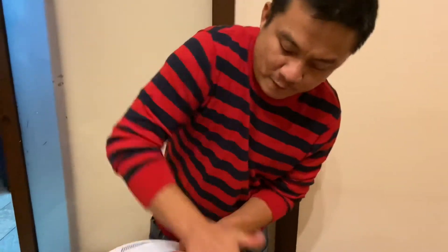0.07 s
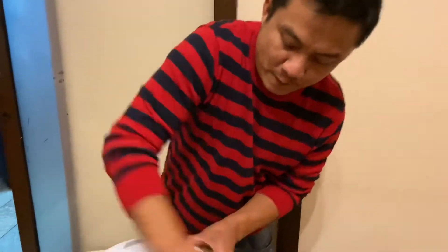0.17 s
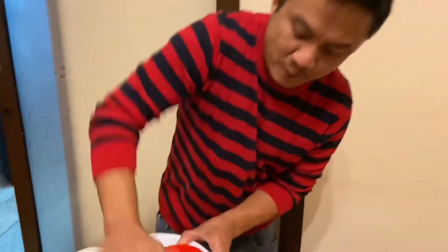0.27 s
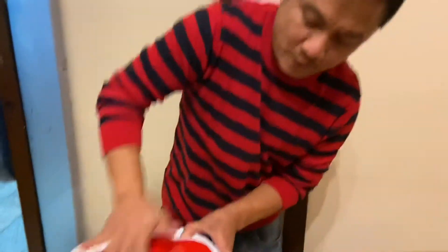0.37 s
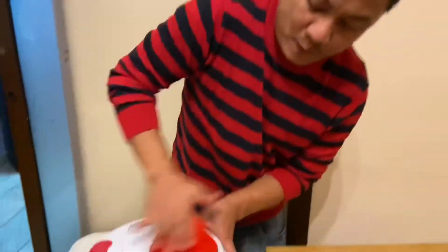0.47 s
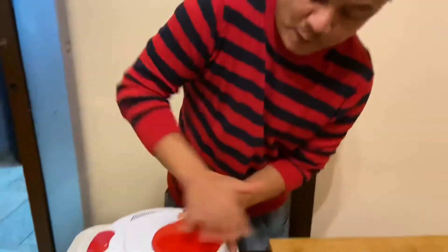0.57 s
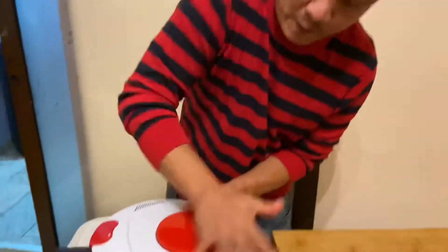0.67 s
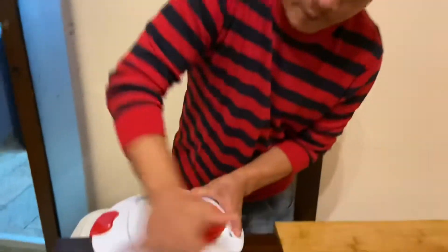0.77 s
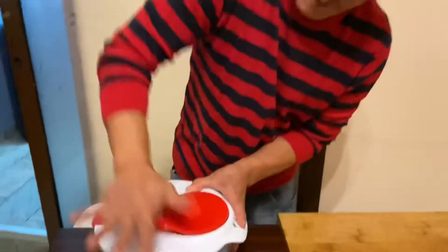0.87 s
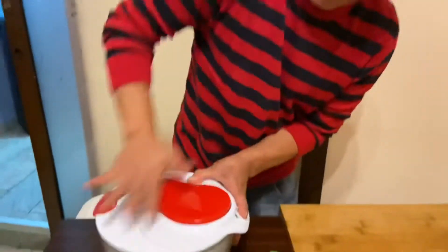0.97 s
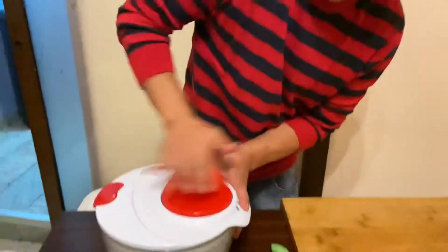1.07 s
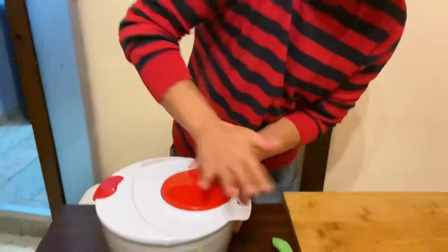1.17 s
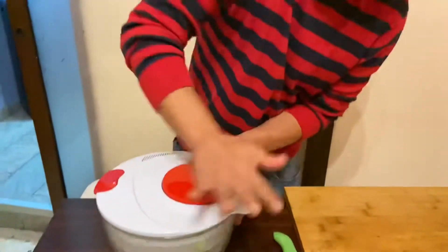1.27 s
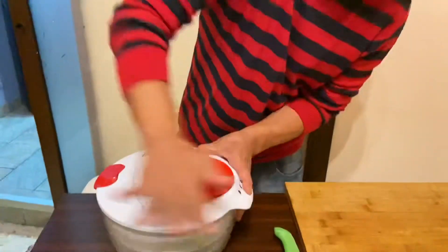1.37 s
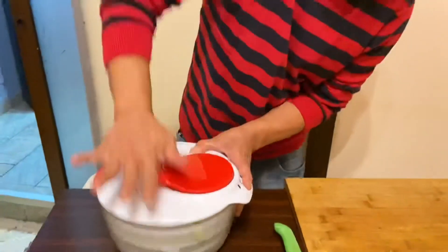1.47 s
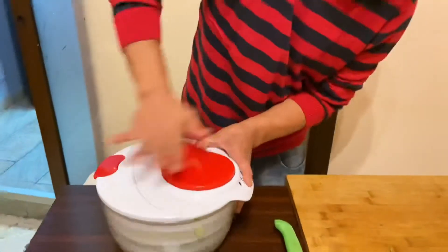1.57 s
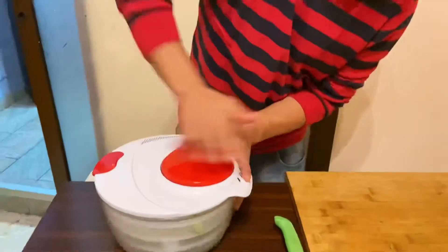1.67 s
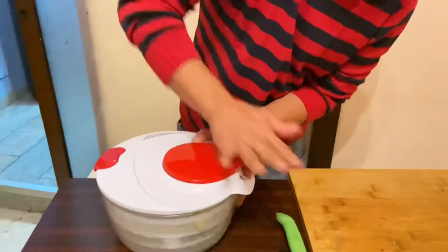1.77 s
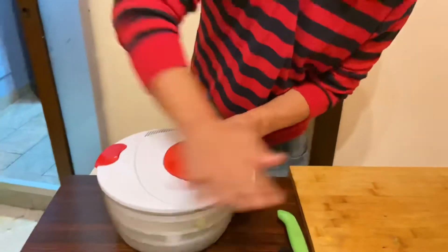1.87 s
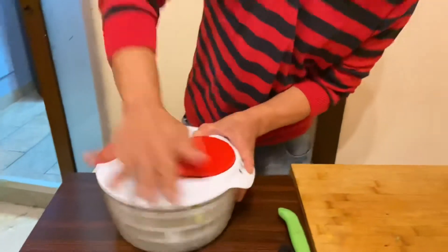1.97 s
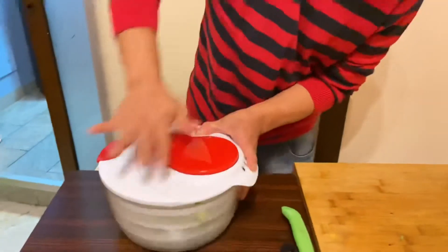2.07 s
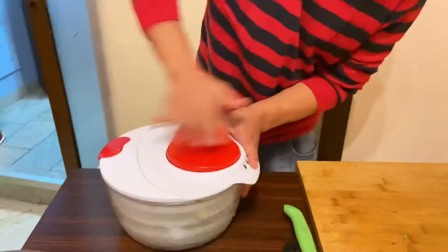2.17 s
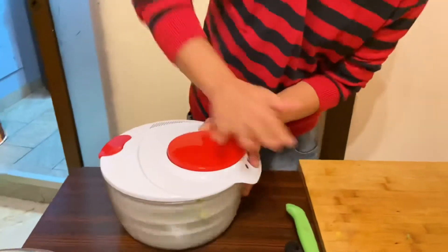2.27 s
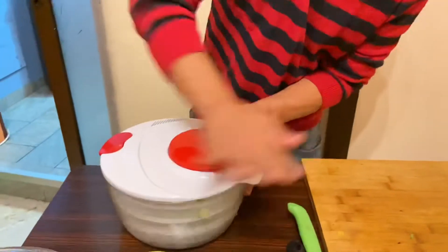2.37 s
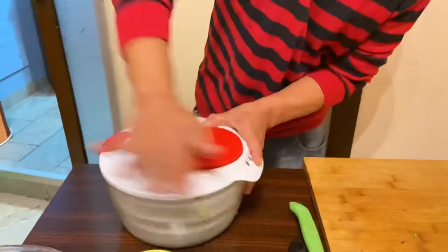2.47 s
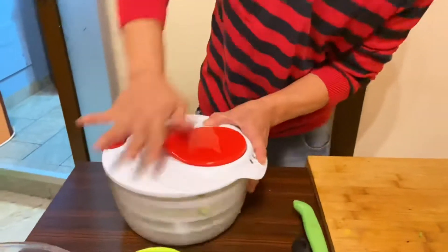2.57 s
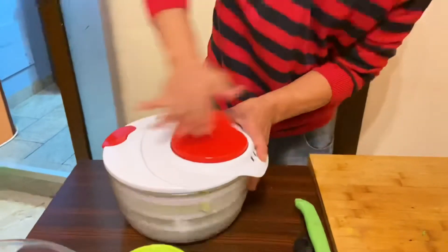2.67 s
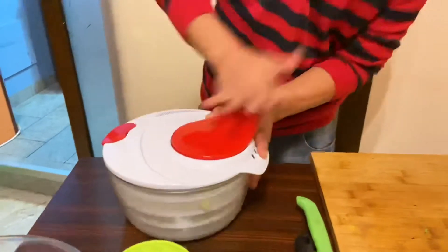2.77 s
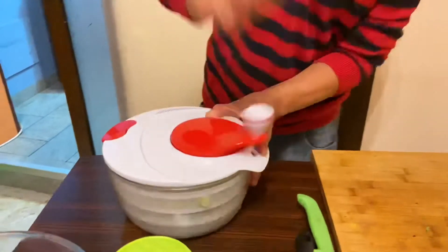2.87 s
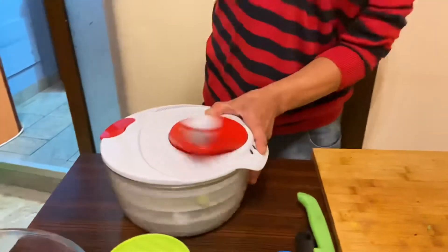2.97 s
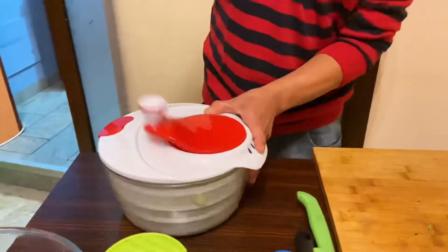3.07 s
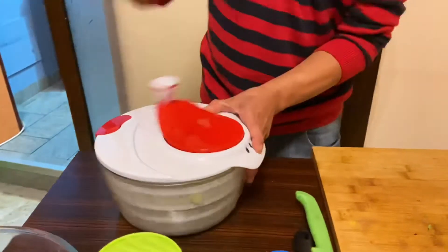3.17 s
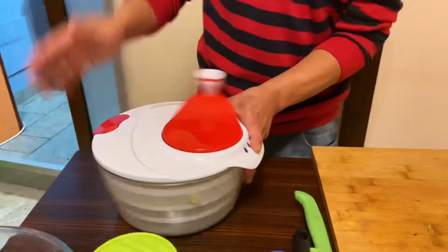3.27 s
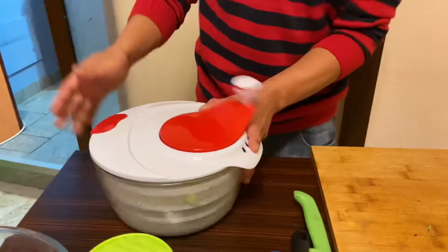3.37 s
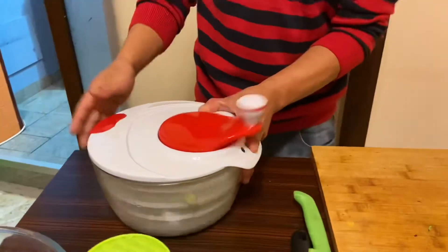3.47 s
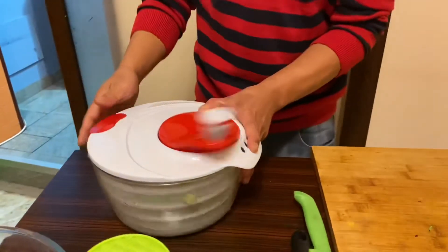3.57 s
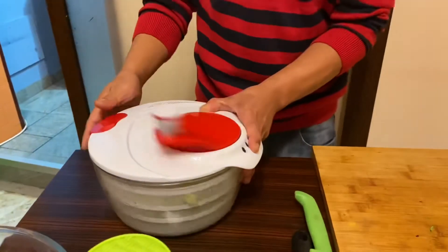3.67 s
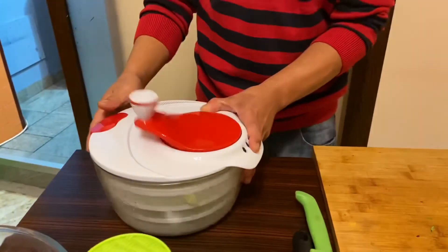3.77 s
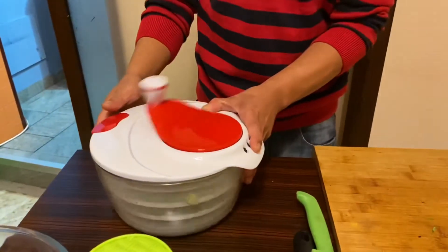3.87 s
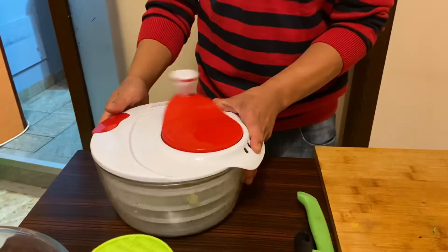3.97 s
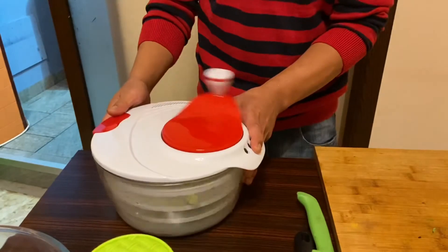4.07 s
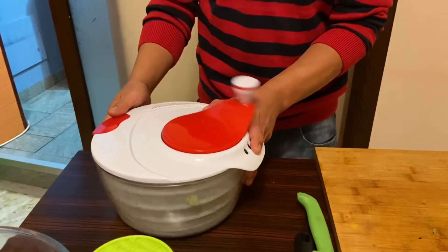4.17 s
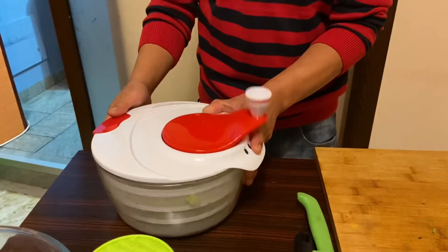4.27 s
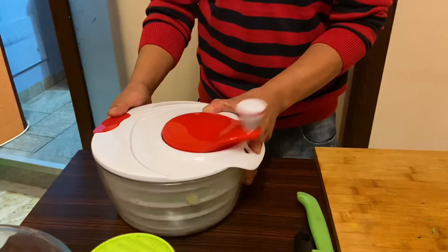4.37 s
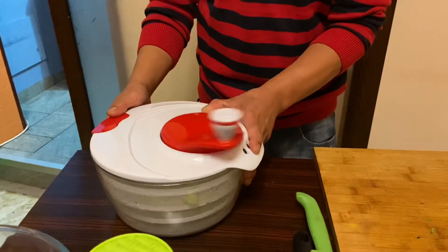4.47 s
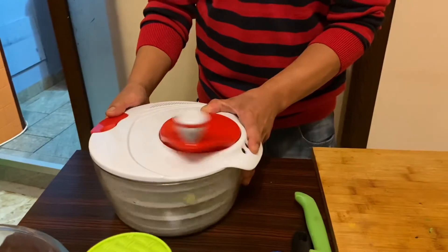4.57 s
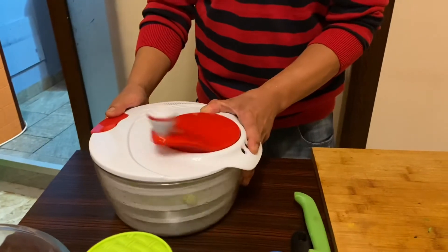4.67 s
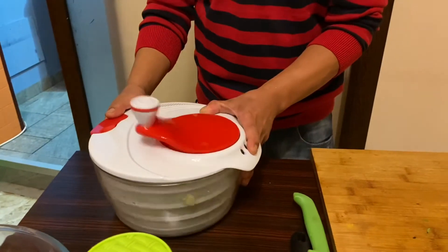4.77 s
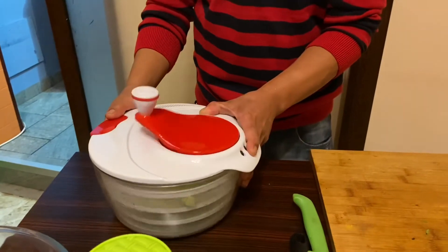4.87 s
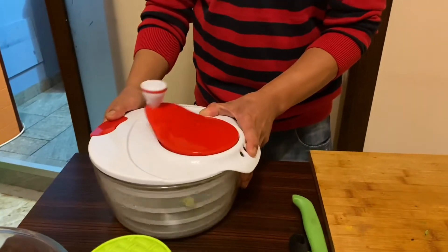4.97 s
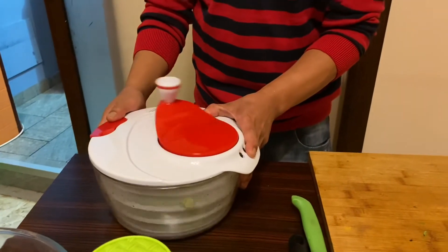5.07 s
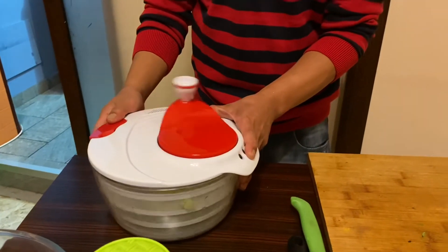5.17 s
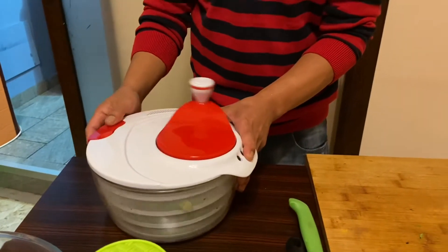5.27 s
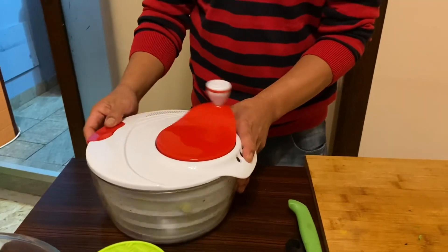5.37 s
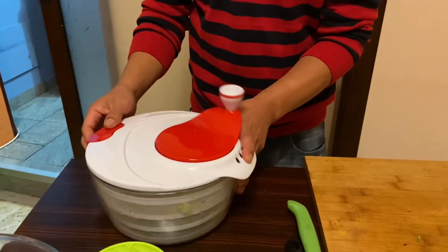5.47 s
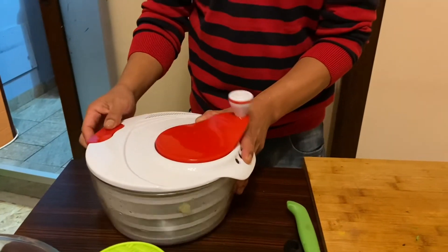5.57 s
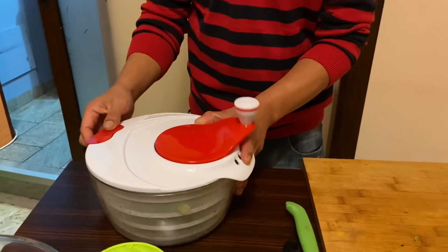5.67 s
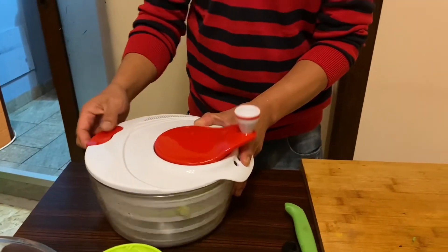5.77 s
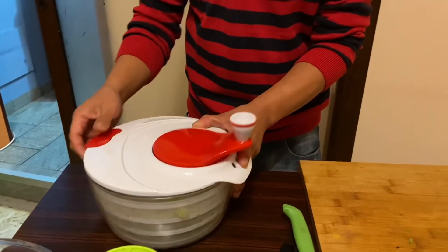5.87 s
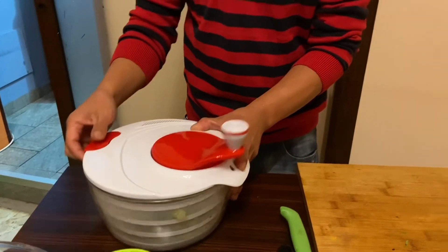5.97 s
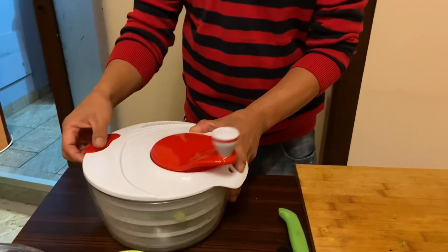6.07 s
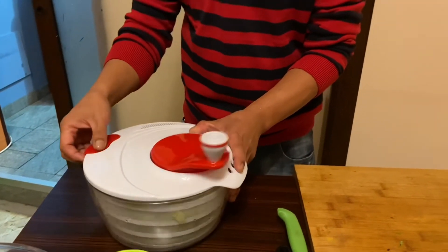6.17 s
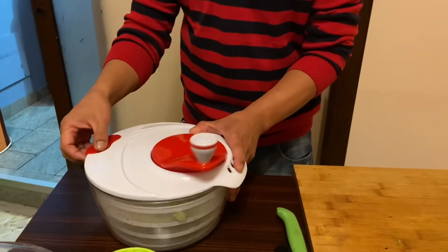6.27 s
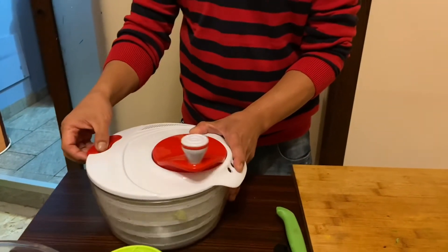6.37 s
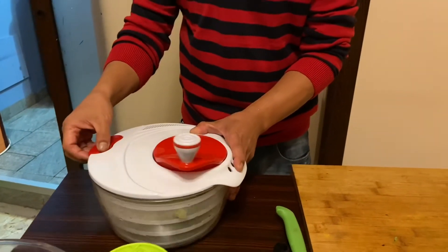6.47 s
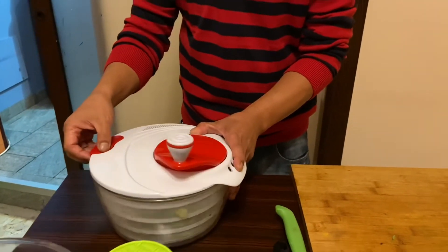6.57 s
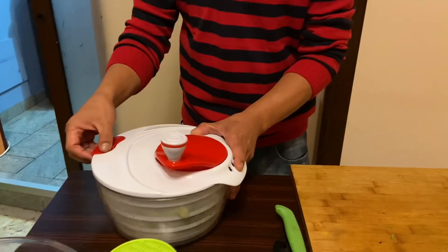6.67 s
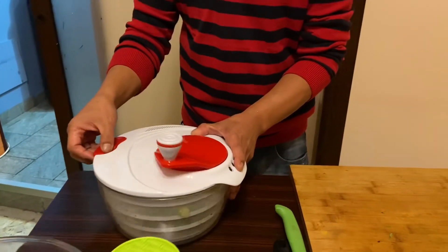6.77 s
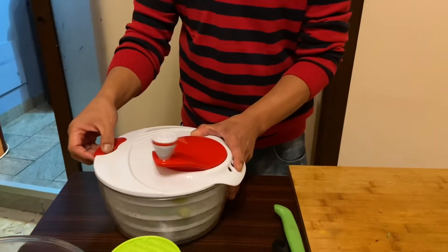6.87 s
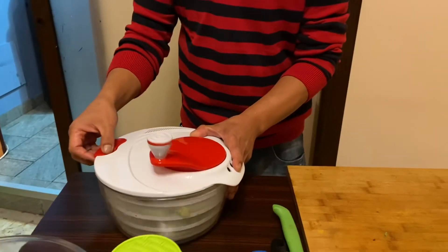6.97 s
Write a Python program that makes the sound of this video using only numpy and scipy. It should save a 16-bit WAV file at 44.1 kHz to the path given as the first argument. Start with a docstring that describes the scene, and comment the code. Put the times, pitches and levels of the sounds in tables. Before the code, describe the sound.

A plastic salad spinner is heard close up on a kitchen table, already fast at 0 s. Until about 2.7 s it is cranked hard: loaded gears growl in pushes a little over half a second apart, the bowl drums hollowly with dull, low bumps, and air hisses through the basket. A strong shove near 0.2 s adds table rumble and rattle. At 2.7-2.8 s the hand slips off; the gears loosen into brighter ticking and hard, rebounding plastic clacks, densest until about 4.4 s. Everything fades gradually as the basket slows. From 5.3 s isolated dry tooth clicks stand out, with a short lull near 5.55 s. A faint low hum swells from 5.8 to 6.4 s, and the rim rubs the lid around 6.2 s. After 6.45 s the airy hiss drops, leaving quiet turning, soft bumps and a few clacks to the end at 7 s. Short room reflections surround it.

```python
"""A plastic salad spinner is cranked hard on a kitchen table, then let go to coast.
First the loaded gears growl with each push, the bowl drums and bumps (resonant noise, short tones)
and the air hisses. From 2.7 s the hand slips off and the slack gears tick more freely and clack
(taps in lid modes); most of it fades with the basket's speed. Past 5 s single teeth click,
a low hum swells and the rim rubs the lid; last, the rush of air drops while the basket still turns."""
import sys
import numpy as np
from scipy import signal
from scipy.fft import rfft, irfft, next_fast_len
from scipy.io import wavfile
from scipy.ndimage import uniform_filter1d

SR = 44100
rng = np.random.default_rng(int(sys.argv[2]) if len(sys.argv) > 2 else 0)


def output_pcm(signal):
    """Save a mono or channel-first signal as 16-bit PCM at the path in sys.argv[1].

    Samples are clipped to [-1, 1] before scaling.
    """
    pcm = np.clip(np.atleast_2d(signal).T, -1, 1) * 32767
    wavfile.write(sys.argv[1], SR, np.round(pcm).astype(np.int16))


N = 309609
TIME_S = np.arange(N) / SR

# basket speed: (time [s], share of top speed [0-1])
SPEED_CURVE = [(0, 0.88), (1.1, 0.82), (2.8, 1), (4, 0.72), (5.3, 0.46), (6.4, .36), (6.6, 0.37),
               (7.02, 0.38)]
# heavy bumps: (time of crest [s], level [dB], pitch [Hz], jar of gear housing [relative dB])
HEAVY_BUMPS = [(.185, 0, 229, -10), (.482, -8, 258, -14), (.584, -3, 261, -25), (.797, -8, 276, -9),
               (.923, -7.5, 253, -10), (1.018, -2.5, 272, -17), (1.121, -3.5, 268, -18),
               (1.286, -4.5, 232.6, -22), (1.858, -4.5, 270.4, -9.5), (1.9, -4, 244, -16),
               (2.179, -2, 244.7, -10), (2.358, -6, 271, -9), (2.448, -1, 181, -14), (2.555, -6.5, 235, -8),
               (2.772, -5.5, 271, -23), (2.966, -3, 269.6, -11), (3.257, -5, 253, -24),
               (4.335, -10, 251, -4), (4.757, -6.5, 289, -8), (5.928, -17, 260, -11.5),
               (6.795, -17, 262, -4), (6.942, -15.5, 256, -11)]
# hard clacks of crank and gears: (time [s], level [dB], knock [relative dB], crack [relative dB],
# step per rebound [dB], never upward)
HARD_CLACKS = [(0.5562, -2.5, -3, -8, -24), (0.657, -14.5, -3, -25, -14), (2.762, -13.5, -4, -1, -6.5),
               (2.8155, -4.5, -5.5, -25, -18), (2.857, -10, -0.5, -8, -2), (2.8713, -13, -4, -6.5, -19),
               (2.955, -7, -8, -27, -7), (3.098, -10.5, -11, -7, -6), (3.19, -7, -5, -15, -17),
               (3.222, -11.5, -4, -14, -2.5), (3.275, -17, 8.5, -30, -7), (3.297, -13.5, -4, -16, 1),
               (3.4098, -9, 4, -9, -12), (3.4502, -10.5, 4, -22, -2.5), (3.5723, -7.5, -6, -10, -13),
               (3.6656, -13.5, -4, -6, -2.5), (3.8874, -6.5, -1, -35, -7), (4.131, -12, 2.5, -29, -10),
               (4.157, -14, -5, -10, -20), (4.2496, -13.5, -2, -28, -7), (4.3625, -10, -7, -3.5, -24),
               (4.546, -19.5, 5, -15, 0), (4.7515, -18, -1, -28, -7), (4.758, -13, 1, -4, -8),
               (4.996, -7, -0.5, -15, -12), (5.0705, -13.5, 3.5, -37, -5), (5.2345, -29, 7, -29, -6),
               (5.389, -18.5, -1.5, -19, -7), (5.6765, -20.5, -2, -5.5, -10), (6.0786, -20, 2.5, -7, -15),
               (6.4567, -17.5, -2, -14, -10.5), (6.6498, -23.5, 4, -8, -13), (6.715, -12.5, -2, -4.5, -25),
               (6.9326, -23.5, 3, -36, -12)]
# single gear teeth caught by the slowing crank: (time [s], level [dB])
TOOTH_CATCHES = [(5.3218, -26), (5.3536, -27.5), (5.7, -24.5), (5.743, -25), (5.7563, -19.5), (5.7753, -30),
                 (5.8184, -25), (5.8563, -25), (5.908, -30), (5.9519, -25.5), (6.0005, -26.5), (6.102, -24),
                 (6.1535, -24)]
# gears lose touch and fall quiet: (middle [s], half length [s], level change [dB])
GEAR_LULLS = [(0.834, 0.021, -3), (4.898, 0.052, -7.5), (5.55, 0.06, -12), (6.6, 0.042, -9)]
# air and walls of the bowl: (frequency [Hz], width [Hz], level [dB])
BOWL_MODES = [(145.5, 51, -6), (184.3, 12.8, 1.5), (220.2, 27.4, -2.5), (271.8, 53.5, -0.5),
              (438.4, 37, -13.5)]
# gear housing under load: (frequency [Hz], width [Hz], level [dB])
HOUSING_MODES = [(433, 92, 0.5), (546, 75, 1), (900, 136, -12)]
# lid and its gears: (frequency [Hz], width [Hz], level [dB])
LID_MODES = [(327, 53, 0.5), (502, 165, 11), (630, 37, 16), (686, 31, 15.5), (849, 210, 4.5),
             (1024, 106, 4.5), (1245, 220, 2), (1510, 144, -1), (1752, 78, 1), (1966, 220, -3.5),
             (2945, 405, -9.5), (3430, 360, -13), (4650, 170, -17)]
# stiff part of the crank: (frequency [Hz], width [Hz], level [dB])
CRANK_MODES = [(3460, 400, 14), (4970, 360, 14.5), (6440, 500, 8), (11800, 12000, -9)]
# gear tooth: (frequency [Hz], width [Hz], level [dB])
TOOTH_MODES = [(3320, 410, 6), (3940, 290, 6), (4870, 800, 3.5)]
# what the rim's rub sets ringing: (frequency [Hz], width [Hz], level [dB])
RUBBED_MODES = [(686, 11.3, 9), (1230, 130, -7.5), (1730, 89, -5.5), (3360, 750, -17)]
# air rushing through the basket: (frequency [Hz], relative spectral level [dB])
AIR_SPECTRUM = [(300, 27.5), (1000, 17), (2000, 13), (3000, 6), (4200, 2.5), (5000, 4.5), (6000, 3),
                (7400, 4.5), (10000, 2.5), (16000, -2.5)]
# two microphone ports: (frequency [Hz], lead of left over right [rad])
PORT_LEAD = [(0, 0), (860, .45), (1200, .45), (3400, 1.0), (6000, .5), (7100, 0), (15400, -12.5),
             (22050, -13)]

# level at top speed, and the power of speed that amplitude follows
DRUM_DB, DRUM_POWER = -14, 1.825
AIR_DB, AIR_POWER = -24.5, 2.16
RATTLE_DB, RATTLE_POWER = -21, 1.745
TICK_DB, TICK_POWER = -36.5, 2.2
# teeth passing at top speed, and the power of speed that this follows
TEETH_PER_S, TEETH_POWER = 85, .5

# hand: load on the gears until it slips off; level changes under full load
LET_GO_S, LET_GO_TAKES_S = 2.695, 0.14
LOADED_RATTLE_DB, LOADED_TICK_DB, LOADED_CLATTER_DB = 0.5, -8, -5.5
FIRST_PUSH_S, CRANK_TURN_S, PUSH_WIDTH_S = 0.235, 0.572, 0.08
PUSH_DB, BETWEEN_PUSHES_DB = -33, -24.5
# first push shoves the bowl against the table
SHOVE_S, SHOVE_HALF_S, SHOVE_RUMBLE_DB, SHOVE_RATTLE_DB = 0.24, 0.12, 10, 5

# light bumps: rate at top speed, level over the drumming, scatter
BASKET_TURNS_PER_S, BUMP_OVER_DRUM_DB, BUMP_SPREAD_DB = 12, 6, 2
BUMP_HZ, BUMP_PITCH_SCATTER, BUMP_JAR_DB = 254.6, 0.071, -16.5
# light clacks: rate at top speed unloaded, level over the rattle, scatter
CLATTER_PER_S, CLATTER_OVER_RATTLE_DB, CLATTER_SPREAD_DB = 50, 0.5, 3
CLATTER_KNOCK_DB, CLATTER_CRACK_DB, CLATTER_REBOUND_DB = -1.5, -12.5, -6.5
REBOUND_S = .0055  # mean gap
MOST_EVENTS = 200  # bound on bumps or clacks

RUB_S, RUB_HALF_S, RUB_DB = 6.195, 0.066, -25.5
AIR_FADE_S, AIR_FADE_TAKES_S, AIR_FADE_DB = 6.45, 0.13, -7
AIR_LULL_SHARE = 0.23  # how far the hiss follows the gear lulls
HUM_HZ, HUM_DB = 81.4, -42.5
HUM_SWELL_START_S, HUM_SWELL_END_S, HUM_SWELL_DB = 5.76, 6.4, 7.5

# sends into the room
BOWL_ROOM_DB, BUMP_ROOM_DB, GEAR_ROOM_DB, CLACK_ROOM_DB, TICK_ROOM_DB = -3, -6, 0.5, -2, 4
KITCHEN_T60_S = 0.4
CUTOFF_HZ = 16000


def drumming(level_db, lumpy_db=3.5, top_hz=700, sway=0.36):
    """The basket rolls unevenly on its pivot; the harder it shakes, the more the lowest modes sway."""
    push = rng.standard_normal(N) * from_db(lumpy_db * drift(16.8))
    low = from_db(sway * (level_db + 14.5)) * resonate(push, BOWL_MODES[:2])
    bowl = low + resonate(push, BOWL_MODES[2:])
    bowl = cut(cut(bowl, top_hz, "low"), 96, "high")
    return from_db(level_db) * even(bowl, 0.065)


def bumps(rows, swell_s=.004):
    """Each soft bump swells and fades in a resonance of the bowl and jars the gear housing."""
    out, t = np.zeros(N), TIME_S[:SR // 10]
    swell = peak_one(t ** 3 * np.exp(-t / swell_s))
    crest_s = np.argmax(swell) / SR
    noises = rng.standard_normal((MOST_EVENTS, len(t)))
    for (s, db, hz, jar_db), noise in zip(rows, noises):
        tone = np.sin(2 * np.pi * (hz * t + noise[0]))  # random phase
        jar = from_db(jar_db) * rms_one(resonate(noise, HOUSING_MODES))
        add(out, s - crest_s, from_db(db) * swell * (tone + jar))
    return out


def light_bumps(speed, drum_db, jitter=.25):
    """The lopsided basket touches its seat about once a turn: rows like HEAVY_BUMPS."""
    strength, tuning = rng.standard_normal((2, N))
    level_db = drum_db + BUMP_OVER_DRUM_DB + BUMP_SPREAD_DB * strength
    pitch_hz = BUMP_HZ * np.exp(BUMP_PITCH_SCATTER * tuning)
    due = moments(BASKET_TURNS_PER_S * speed, jitter)
    return [(TIME_S[i], level_db[i], pitch_hz[i], BUMP_JAR_DB) for i in due]


def growl(driven, rough_db=7.5, rise=.18):
    """Loaded teeth grind over each other, louder and higher with every push on the crank."""
    push_times_s = np.arange(FIRST_PUSH_S, LET_GO_S, CRANK_TURN_S)
    pushes = sum(bell(s, PUSH_WIDTH_S) for s in push_times_s)
    friction = rng.standard_normal(N) * from_db(rough_db * drift(21.5))
    grind = even(resonate(friction, HOUSING_MODES), 0.071)
    pace = 1 + rise * (pushes - .5)
    gliding = np.interp(np.cumsum(pace), np.arange(N), grind)
    return driven * (from_db(BETWEEN_PUSHES_DB) + from_db(PUSH_DB) * pushes) * gliding


def rattle(level_db, driven, taps_per_s=240, size_db=3.5, colour_db=3.5, clump_db=4.5, scrape=0.033):
    """Gear teeth tap the lid in uneven clumps; the hand's load narrows the band."""
    sizes = from_db(size_db * np.minimum(rng.exponential(1, N), 2.5)) * rng.choice([-1, 1], N)
    taps = sizes * (rng.random(N) < taps_per_s / SR) + scrape * rng.standard_normal(N)
    taps = taps * from_db(clump_db * drift(16.6))
    lid = 0
    for k, mode in enumerate(LID_MODES):
        # each tap stirs each mode with a strength of its own
        stirred = taps * from_db(colour_db * rng.standard_normal(N))
        lid = lid + (-1) ** k * resonate(stirred, [mode])
    lid = even(lid, 0.09)
    tight = from_db(-1.5) * cut(cut(lid, 5000, "low", order=1), 1400, "high", order=1)
    return from_db(level_db) * ((1 - driven) * lid + driven * tight)


def clacks(rows, contact_s=0.0008, soft_s=0.0021, plain_db=-17, crack_trim_db=-2.5, knock_trim_db=-3.0):
    """A hard contact cracks in the crank, snaps in the lid, pushes longer on the bowl and rebounds."""
    out, t = np.zeros(N), TIME_S[:SR // 10]
    attack_samples = np.sum(t < .006)
    thud = [(400, 180, 11)]  # (frequency [Hz], width [Hz], level [dB])
    grits = rng.choice([-1, 1], (MOST_EVENTS, len(t)))
    spacings_s = REBOUND_S * rng.uniform(.6, 1.4, (MOST_EVENTS, 4))
    for (s, db, knock_db, crack_db, step_db), grit, gaps_s in zip(rows, grits, spacings_s):
        contact = grit * rebounds(t, step_db, gaps_s, contact_s)
        push = grit * rebounds(t, step_db, gaps_s, soft_s)
        knock = cut(resonate(push, LID_MODES) + resonate(push, thud), 1060, "low")
        snap = resonate(contact, LID_MODES) + from_db(plain_db) * contact
        snap = cut(cut(snap, 1085, "high"), 2960, "low")
        crack = resonate(contact, CRANK_MODES)
        parts = [(knock, knock_db + knock_trim_db), (snap, -3.0), (crack, crack_db + crack_trim_db)]
        for part, part_db in parts:
            strength = np.sqrt(uniform_filter1d(part ** 2, attack_samples).max())
            add(out, s, from_db(db + part_db) * part / strength)
    return out


def rebounds(t, step_db, gaps_s, contact_s):
    """Force of a contact and its rebounds, none stronger than the one before."""
    starts_s = np.cumsum(gaps_s) - gaps_s[0]
    force = 0
    for k, s in enumerate(starts_s):
        force = force + from_db(min(step_db, 0) * k) * (t >= s) * np.exp(-np.abs(t - s) / contact_s)
    return force


def light_clacks(speed, rattle_db, driven, jitter=.6):
    """Gears clack at uneven moments, seldomer when loaded or slow: rows like HARD_CLACKS."""
    level_db = rattle_db + CLATTER_OVER_RATTLE_DB + LOADED_CLATTER_DB * driven
    level_db = level_db + CLATTER_SPREAD_DB * rng.standard_normal(N)
    per_s = CLATTER_PER_S * speed ** 2 * (1 - driven / 2)
    return [(TIME_S[i], level_db[i], CLATTER_KNOCK_DB, CLATTER_CRACK_DB, CLATTER_REBOUND_DB)
            for i in moments(per_s, jitter)]


def ticking(level_db, per_s, uneven=.45, size_db=3, clump_db=3, scuff_s=0.0016, dull_hz=6000):
    """Tooth tips scuff past each other at an unsteady pace, in short flurries."""
    flurry = drift(20)
    teeth = np.floor(np.cumsum(per_s * np.exp(uneven * flurry)) / SR)
    tick_db = size_db * np.clip(rng.standard_normal(N), -2, 1) + clump_db * np.clip(flurry, -2, 1)
    sizes = np.diff(teeth, prepend=0) * from_db(tick_db)
    pressure = signal.lfilter([1], [1, -np.exp(-1 / (scuff_s * SR))], sizes + 1e-18)
    ticks = cut(resonate(pressure * rng.choice([-1, 1], N), TOOTH_MODES), dull_hz, "low")
    return from_db(level_db) * rms_one(ticks)


def catches(contact_s=0.00059, lid_db=-8):
    """A caught tooth slips free with a dry click that also taps the lid."""
    out, t = np.zeros(N), TIME_S[:SR // 20]
    grits = rng.choice([-1, 1], (MOST_EVENTS, len(t)))
    for (s, db), grit in zip(TOOTH_CATCHES, grits):
        contact = grit * np.exp(-t / contact_s)
        click = peak_one(cut(resonate(contact, TOOTH_MODES), 3900, "low"))
        tap = from_db(lid_db) * peak_one(resonate(contact, LID_MODES))
        add(out, s, from_db(db) * (click + tap))
    return out


def rub(rough_db=10.0):
    """The rim of the slow basket scrapes along the lid: rough noise in narrow and wide modes."""
    friction = rng.standard_normal(N) * from_db(rough_db * drift(46))
    scrape = even(resonate(friction, RUBBED_MODES), 0.049)
    return from_db(RUB_DB) * bell(RUB_S, RUB_HALF_S) * scrape


def air(level_db, flutter_db=2.0, width=0.013):
    """Air and spray hiss through the slots of the basket: coloured, fluttering noise."""
    hz, db = np.transpose(AIR_SPECTRUM)
    bins_hz = np.maximum(np.fft.rfftfreq(N, 1 / SR), 1)
    colour = from_db(np.interp(np.log(bins_hz), np.log(hz), db))
    noise = irfft(rfft(rng.standard_normal((2, N))) * colour, N)
    mid, side = rms_one(cut(noise, 390, "high"))
    return from_db(level_db + flutter_db * drift(30.0)) * stereo(mid, width * side)


def table(drum_db, shove_db, follow=0.57, offset_db=-27.5, top_hz=85, width=0.2):
    """The table rumbles dully under the shaking bowl, most when the bowl is shoved."""
    noise = cut(rng.standard_normal((2, N)), top_hz, "low")
    mid, side = rms_one(cut(noise, 44.0, "high", order=6))
    return from_db(follow * drum_db + offset_db + shove_db) * stereo(mid, width * side)


def hum(waver_db=2.5, wander_hz=1.27):
    """A low sine wavers in pitch and level and swells once."""
    phase = 2 * np.pi * np.cumsum(HUM_HZ + wander_hz * drift(4.6)) / SR
    swell_db = held(HUM_SWELL_START_S, HUM_SWELL_END_S, HUM_SWELL_DB)
    return np.sqrt(2) * from_db(HUM_DB + swell_db + waver_db * drift(5.4)) * np.sin(phase)


def kitchen(x, alike_below_hz=330, dull_hz=6000, early_db=6, early_s=0.0023):
    """Quick reflections off table and body, then the walls; long waves reach both microphones alike."""
    t = TIME_S[:SR // 2]
    decay = from_db(-60 * t / KITCHEN_T60_S) + from_db(early_db) * np.exp(-t / early_s)
    tails = rng.standard_normal((2, len(t))) * decay * (t > .001)
    mid, side = cut(tails / np.sqrt(np.sum(tails ** 2)), dull_hz, "low", order=1)
    side = cut(side, alike_below_hz, "high")
    mid = from_db(-1.5) * cut(mid, alike_below_hz, "high")
    return signal.fftconvolve(x[None], stereo(mid, side), axes=1)[:, :N]


def from_db(db):
    """Decibels to gain."""
    return 10 ** (np.asarray(db) / 20)


def rms_one(x):
    """Scale to an rms of 1."""
    return x / np.sqrt(np.mean(x ** 2) + 1e-20)


def peak_one(x):
    """Scale to a peak of 1."""
    return x / np.abs(x).max()


def even(x, seconds):
    """Hold the running rms at 1."""
    return x / np.sqrt(np.abs(uniform_filter1d(x ** 2, int(seconds * SR))) + 1e-20)


def drift(rate):
    """Slow chance with an rms of 1: smoothed noise at SR / 40, interpolated."""
    r = np.exp(-80 * np.pi * rate / SR)
    noise = rng.standard_normal(N // 40 + 2002)
    slow = signal.lfilter([1], [1, -2 * r, r * r], noise)[2000:]  # skip the onset
    return np.interp(np.arange(N) / 40, np.arange(len(slow)), rms_one(slow))


def cut(x, hz, kind, order=2):
    """Butterworth low- or high-pass."""
    sos = signal.butter(order, min(hz, .45 * SR), kind, fs=SR, output="sos")
    return signal.sosfilt(sos, x + 1e-18)


def resonate(x, modes):
    """Parallel resonances with alternating signs."""
    out = 0
    for k, (hz, width_hz, db) in enumerate(modes):
        r = np.exp(-np.pi * width_hz / SR)
        poles = [1, -2 * r * np.cos(2 * np.pi * hz / SR), r * r]
        gain = (-1) ** k * from_db(db) * (1 - r * r) / 2
        out = out + gain * signal.lfilter([1, 0, -1], poles, x + 1e-18)
    return out


def bell(middle_s, half_s):
    """A smooth rise to 1 and fall around a moment."""
    return np.exp(-((TIME_S - middle_s) / half_s) ** 2)


def held(start_s, end_s, height, attack_s=.04, release_s=0.063):
    """Attack, hold and release."""
    ramps = np.minimum((TIME_S - start_s) / attack_s, (end_s - TIME_S) / release_s)
    return height * np.clip(ramps + .5, 0, 1)


def faded(start_s, takes_s, db):
    """A slide to a new level that then stays."""
    return db * np.clip((TIME_S - start_s) / takes_s, 0, 1)


def moments(per_s, jitter):
    """Sample numbers of events at a changing rate, each early or late by a share of its period."""
    turns = np.cumsum(per_s) / SR
    due = np.arange(MOST_EVENTS) + jitter * rng.standard_normal(MOST_EVENTS)
    return np.searchsorted(turns, due[(due > 0) & (due < turns[-1])])


def add(track, s, sound):
    """Mix a sound in at a time."""
    start = int(np.clip(s * SR, 0, N - 1))
    track[start:start + len(sound)] += sound[:N - start]


def stereo(mid, side):
    """Left and right from mid and side."""
    return np.array([mid + side, mid - side])


def pan(x, left_db):
    """Raise the left channel and lower the right."""
    return x * from_db([[left_db], [-left_db]])


def scene():
    """The basket's speed and the hand's load drive bowl, gears and air, with the room around them."""
    speed = np.interp(TIME_S, *np.transpose(SPEED_CURVE))
    speed_db = 20 * np.log10(speed)
    driven = 1 - faded(LET_GO_S, LET_GO_TAKES_S, 1)  # 1 under full load, 0 free
    lull_db = sum(db * bell(s, half_s) for s, half_s, db in GEAR_LULLS)
    shove = bell(SHOVE_S, SHOVE_HALF_S)

    drum_db = DRUM_DB + DRUM_POWER * speed_db
    rattle_db = RATTLE_DB + RATTLE_POWER * speed_db + LOADED_RATTLE_DB * driven
    rattle_db = rattle_db + lull_db + SHOVE_RATTLE_DB * shove
    tick_db = TICK_DB + TICK_POWER * speed_db + LOADED_TICK_DB * driven + lull_db
    air_db = AIR_DB + AIR_POWER * speed_db + AIR_LULL_SHARE * lull_db
    air_db = air_db + faded(AIR_FADE_S, AIR_FADE_TAKES_S, AIR_FADE_DB)

    bowl = drumming(drum_db) + growl(driven)
    thumps = bumps(HEAVY_BUMPS + light_bumps(speed, drum_db))
    gears = rattle(rattle_db, driven) + rub()
    knocks = clacks(HARD_CLACKS + light_clacks(speed, rattle_db, driven))
    ticks = ticking(tick_db, TEETH_PER_S * speed ** TEETH_POWER) + catches()
    around = air(air_db) + table(drum_db, SHOVE_RUMBLE_DB * shove) + hum()

    direct = bowl + thumps + pan(gears + knocks, left_db=1.5) + pan(ticks, left_db=7.0)
    sends = [(bowl, BOWL_ROOM_DB), (thumps, BUMP_ROOM_DB), (gears, GEAR_ROOM_DB),
             (knocks, CLACK_ROOM_DB), (ticks, TICK_ROOM_DB)]
    room = kitchen(sum(from_db(db) * source for source, db in sends))
    return direct + room + around


def record(dry):
    """The ports shift the channels against each other, the loudest peaks overload, the top is cut."""
    size = next_fast_len(N + SR // 10)
    lead_rad = np.interp(np.fft.rfftfreq(size, 1 / SR), *np.transpose(PORT_LEAD))
    shift = np.exp(.5j * lead_rad * np.array([[1], [-1]]))  # half the lead to each side
    heard = irfft(rfft(dry, size) * shift, size)[:, :N]
    heard = heard / (1 + heard ** 8) ** (1 / 8)
    return signal.sosfilt(signal.ellip(10, .1, 80, CUTOFF_HZ, fs=SR, output="sos"), heard)


dry = scene()
out = record(dry)
output_pcm(out)
```